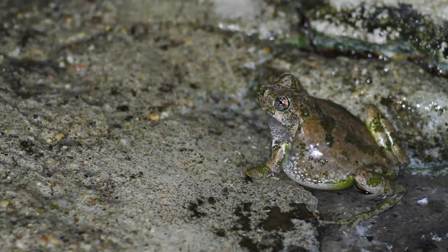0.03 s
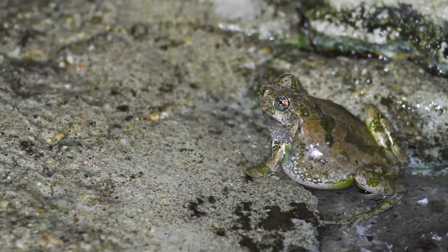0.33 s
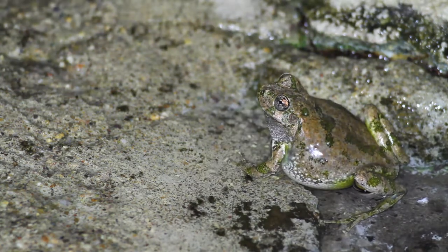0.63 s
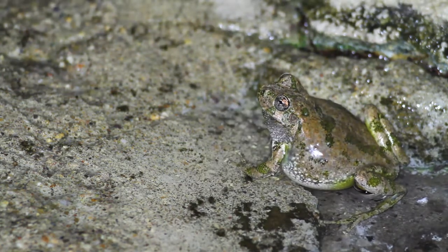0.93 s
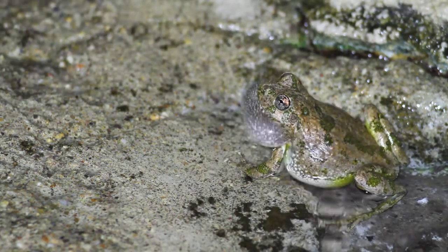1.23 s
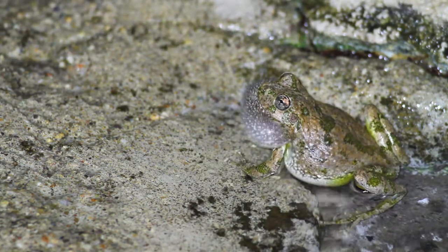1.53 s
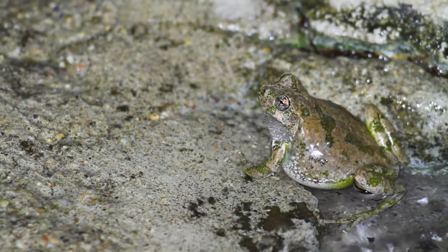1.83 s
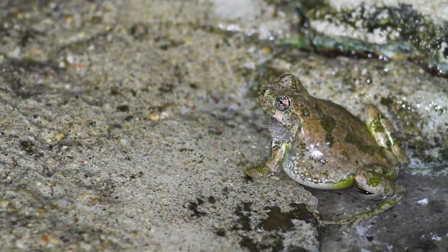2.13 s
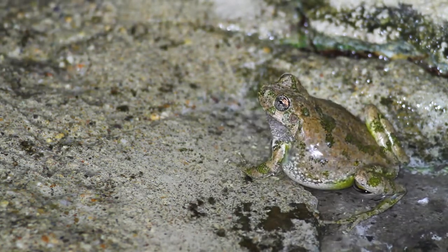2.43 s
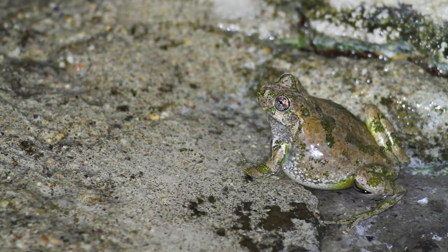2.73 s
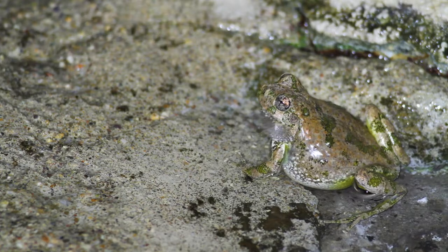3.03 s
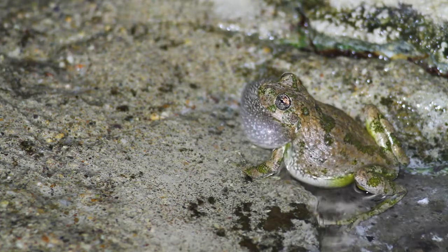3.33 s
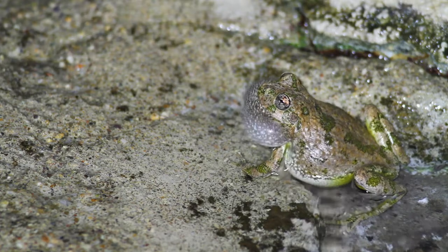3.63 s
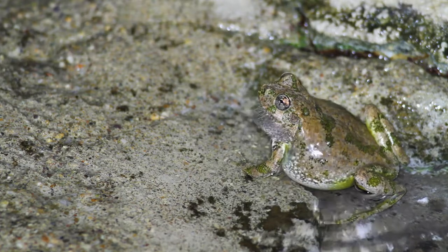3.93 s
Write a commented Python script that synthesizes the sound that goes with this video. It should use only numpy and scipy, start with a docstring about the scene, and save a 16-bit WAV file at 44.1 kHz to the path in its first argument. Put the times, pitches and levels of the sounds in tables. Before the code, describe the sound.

Tree frogs call in fast rattling trills. After a clipped note and small splashes, two frogs overlap from about 0.3 to 1.1 seconds. A close frog trills from 1.2 to 1.8, and a softer one follows until 2.2. Two return around 2.4, joined by the close frog from 3.2 to 3.9. Light drips, a distant chorus, faint low hum and night air continue throughout.

```python
"""Night on wet concrete by shallow water: faint air, a hum, a far chorus and droplets run throughout.
One short frog note ends a trill at the very start; splashes and plops follow. Then four tree frogs trill
in overlapping turns: one opens, another breaks in with two squawks, then the near one, then a softer one;
three return. A trill runs at about 28 notes a second and slows a little. Each note is a short rising
hoot of the vocal sac; on two of its cycles the larynx snaps and rings the throat near 2.4 kHz."""
import sys
import numpy as np
from scipy import signal
from scipy.fft import rfft, irfft
from scipy.io import wavfile

SR = 44100
rng = np.random.default_rng(int(sys.argv[2]) if len(sys.argv) > 2 else 0)


def to_wav(sig):
    """Store sig (one row per channel, or 1-D mono) as 16-bit WAV at the path in sys.argv[1].

    Samples outside -1..1 are clipped; the rate is SR.
    """
    pcm = np.clip(np.atleast_2d(sig), -1, 1) * 32767
    pcm = np.round(pcm).astype(np.int16)
    wavfile.write(sys.argv[1], SR, pcm.T)  # frames by channels


N = 176400
TIME = np.arange(N) / SR
NOTE_TIME = np.arange(-int(.03 * SR), int(.025 * SR)) / SR  # seconds around a note's first snap

# Tone of the night air and of the far chorus. Each row: frequency in Hz, relative level in dB.
AIR_SPECTRUM = [(20, -25), (50, -10.5), (90, -6), (130, -2.5), (180, -11), (320, -1), (600, -8), (1500, -4),
                (3000, -8), (5500, -10.5), (8500, -19.5), (13000, -19), (16000, -45)]
CHORUS_SPECTRUM = [(400, -30), (560, -12), (800, -4), (1100, -6), (1600, -9), (2000, -1), (2400, 2),
                   (2750, -4), (3300, -14), (6000, -28)]
# Partials of the hum. Each row: frequency in Hz, level in dB.
HUM_PARTIALS = [(74, -83), (91.5, -64.5), (127, -68)]
# Rings of the finest droplets. Each entry: frequency in Hz.
DROPLET_RINGS = [4200, 4970, 5730, 7700, 9900, 12400, 14000]
# Short rings: first a 2.3 kHz frog note that ends a trill, then the plops.
# Each row: start in seconds, pitch in Hz, peak in dB, decay in seconds.
RING_CUES = [(.021, 2300, -24, 0.0016), (.234, 2200, -28.5, 0.0019), (.352, 315, -47.5, 0.014),
             (0.544, 273, -40, 0.0068), (3.075, 180.7, -53, 0.011)]
# Splashes and drips. Each row: start in seconds, peak before the trim in dB, ring in Hz.
SPLASH_CUES = [(0.0543, -24, 12000), (0.2349, -18.5, 6040), (0.4219, -31, 4670), (0.4918, -27, 12500),
               (0.5397, -18, 8330), (0.5985, -29, 8710), (0.6394, -29, 4130), (1.1373, -26, 9700),
               (1.4711, -23.5, 9450), (1.5539, -37.5, 4150), (1.8562, -37, 4590), (2.4523, -29, 6410),
               (2.6698, -32, 4560), (2.9906, -28, 11400), (3.1547, -31, 4540), (3.2151, -27, 4130),
               (3.2675, -33, 8020), (3.5109, -34, 5760), (3.6431, -29, 4800), (3.8332, -26.5, 13400),
               (3.9335, -35, 10780), (3.9644, -27, 5510)]
# Throat colour, by frog. Each row: frequency in Hz, relative level in dB.
THROAT_SPECTRA = { "near": [(250, -36), (600, -13), (760, -7), (880, -14), (1100, -8), (1600, -10),
                  (2000, -12), (2300, 3), (2500, 4), (2820, 0), (3000, -16), (3400, -20), (3900, -20),
                  (4400, -29), (4700, -27), (5300, -38), (6000, -31), (9000, -48), (16000, -60)],
                  "second": [(250, -44), (600, -14), (900, -9), (1300, -7), (1620, -7), (1870, -17),
                  (2130, 3), (2400, 6), (2730, 1), (2930, -9), (3300, -12), (3650, -25), (4900, -26),
                  (6000, -40), (9000, -49), (16000, -58)], "third": [(250, -29), (600, 2), (950, -3),
                  (1200, 1), (1600, 0), (1800, -5), (2100, 1), (2370, 14), (2700, 6), (3100, -4),
                  (3700, -10), (4500, -22), (6000, -30), (16000, -60)], "fourth": [(250, -34.5),
                  (650, -7.5), (900, -10), (1300, -6), (1650, -9), (2000, -1), (2350, 4), (2700, -6),
                  (3100, -13), (3700, -13.5), (4400, -29), (6000, -32), (16000, -56.5)]}
# Voice, by frog. Each row: hoot pitch in Hz, rise per second as a share of that pitch, hold in seconds,
# buzz gain in dB, second snap against the first in dB, share of snaps two cycles apart instead of
# three, snap unevenness in dB.
FROG_VOICES = { "near": (563, 11.5, .0085, -7, .4, 0, .4), "second": (540.5, 8, .0065, -3, -1.5, .75, 1.2),
               "third": (535.5, 7, .007, -2, -1.5, .9, 1.5), "fourth": (561.5, 11.5, .0074, -2, -4, 0, .5)}
# Hoots that open a trill before the larynx snaps. Each row: frog, time in seconds, level in dB.
OPENING_CUES = [("third", .263, -27.5), ("second", .419, -19.5), ("near", 1.144, -21),
                ("second", 2.377, -25.5), ("third", 2.506, -17.5), ("near", 3.121, -16)]
# Trills. Each row: frog, first note in seconds, end in seconds, first note spacing in seconds,
# slowing in seconds per note, hoot level in dB, hoot fade in dB per second, snap level in dB,
# how much softer it starts in dB, throat sag per second as a share of its pitch.
TRILL_CUES = [ ("third", .2958, .845, .0338, .00022, -26, 0, -10.5, 1.5, 0),
              ("second", .4518, 1.085, .03175, .00028, -18.3, 8, -5.3, 1.8, 0),
              ("near", 1.1745, 1.835, .0345, .00011, -17, .87, -4.7, 6, .03),
              ("fourth", 1.639, 2.015, .035, .00017, -28.5, 0, -9.3, 3.6, .03),
              ("fourth", 2.0486, 2.225, .0365, .0014, -27, 0, -8.8, 0, .03),
              ("second", 2.4064, 2.92, .03436, .00012, -20, 5.3, -4.5, 2.2, 0),
              ("third", 2.5372, 3.80, .0335, .000122, -22, 3, -10.5, 0, 0),
              ("near", 3.1564, 3.922, .03474, .000084, -18, 0, -4.8, 2.5, .01)]
# Squawks. Each row: frog, time in seconds, hoot level in dB, snap level in dB, hold in seconds,
# extra buzz in dB, throat pitch as a share of normal.
SQUAWK_CUES = [("second", .447, -23, -11, .010, 8, .84), ("second", .479, -29, -15, .009, 7, .92)]
# Tone of the echo from walls and trees. Each row: frequency in Hz, relative level in dB.
ECHO_SPECTRUM = [(200, -14), (550, -12), (900, 1), (1500, 0), (2050, 0.5), (2450, 1), (2900, -3.5),
                 (5000, -2), (12000, -9)]

AIR_DB, CHORUS_DB, CHORUS_THROB, CHORUS_NOTES_PER_S = -47.5, -44.5, .66, 22
PATTER_PER_S, PATTER_DB, PATTER_SPREAD_DB = 200, -51, 4
DRIP_DECAY_S, SPLASH_TRIM_DB = .0032, -1
HOOT_ATTACK_S, HOOT_RELEASE_S, OCTAVE_DB = .0065, .0025, -17
FLUTTER_DEPTH, FLUTTER_HZ = .22, 300
RASP_DB, BUZZ_SCATTER_DB, BUZZ_SOFT_HZ = -19.5, 3, 2960
CYCLE_JITTER_S, SNAP_LAG_S = .00004, .00011  # the second snap lands just after its cycle
SLACK_TENSION = .965  # below this the snaps always fall two cycles apart
THROAT_RING_S, THROAT_LOW_CUT_HZ = .0028, 470
PITCH_SCATTER, THROAT_SCATTER, HOOT_SCATTER_DB, NOTE_JITTER_S = .006, .008, .3, .0002
SWELL_S, CLIMB_S, CLIMB_SHARE = .1, .08, .07  # the throat starts flat by this share and tightens
ECHO_DB, ECHO_CENTRE_S, TAIL_DB, TAIL_T60_S = -18.5, .0083, -19, .6
CUTOFF_HZ = 15900


def from_db(db):
    """Decibels to gain."""
    return 10 ** (np.asarray(db) / 20)


def rms_one(x):
    """Scale to unit power."""
    return x / np.sqrt(np.mean(x ** 2) + 1e-20)


def add(out, start_s, sound):
    """Mix a sound in at a given time."""
    i = int(np.clip(start_s * SR, 0, N - 1))
    out[i:i + len(sound)] += sound[:N - i]


def butter(x, order, hz, kind):
    """Low-pass or high-pass filter."""
    return signal.sosfilt(signal.butter(order, hz, kind, fs=SR, output="sos"), x)


def eq_curve(spectrum, size, stretch=1):
    """A spectrum as a gain per FFT bin; stretch scales its frequencies."""
    hz, db = np.transpose(spectrum)
    bins = np.maximum(np.fft.rfftfreq(size, 1 / SR), 1)
    return from_db(np.interp(np.log(bins), np.log(hz * stretch), db))


def coloured_noise(spectrum):
    """Unit-power noise with a given spectrum."""
    return rms_one(irfft(rfft(rng.standard_normal(N)) * eq_curve(spectrum, N), N))


def resonance(x, hz, width_hz):
    """Two-pole resonance with unit gain at its top."""
    r = np.exp(-np.pi * width_hz / SR)
    feedback = [1, -2 * r * np.cos(2 * np.pi * hz / SR), r * r]
    return signal.lfilter(np.array([1, 0, -1]) * (1 - r * r) / 2, feedback, x + 1e-18)


def short_rings(cues):
    """Single pitches that bloom and die quickly."""
    out, t = np.zeros(N), TIME[:SR // 10]
    for start_s, hz, db, decay_s in cues:
        envelope = t / decay_s * np.exp(1 - t / decay_s)
        add(out, start_s, from_db(db) * envelope * np.sin(2 * np.pi * hz * t))
    return out


def night_air():
    """A soft, steady bed of noise."""
    return from_db(AIR_DB) * coloured_noise(AIR_SPECTRUM)


def hum():
    """Three faint, low, steady tones."""
    return sum(from_db(db) * np.sqrt(2) * np.sin(2 * np.pi * (hz * TIME + rng.random()))
               for hz, db in HUM_PARTIALS)


def far_chorus():
    """Distant frogs blur into one throbbing band."""
    throb = 1 + CHORUS_THROB * np.sin(2 * np.pi * CHORUS_NOTES_PER_S * TIME)
    return from_db(CHORUS_DB) * throb * coloured_noise(CHORUS_SPECTRUM)


def patter():
    """Fine droplets land at random, each a tiny ringing burst of spray."""
    out = np.zeros(N)
    for hz in DROPLET_RINGS:
        lands = rng.random(N) < PATTER_PER_S / len(DROPLET_RINGS) / SR
        drops = lands * from_db(PATTER_SPREAD_DB * np.minimum(rng.exponential(1, N), 4))
        envelope = signal.lfilter([1], [1, -np.exp(-1 / (DRIP_DECAY_S * SR))], drops + 1e-18)
        out += resonance(envelope * rng.standard_normal(N), hz, width_hz=1900)
    return from_db(PATTER_DB) * rms_one(out)


def lone_frog_note():
    """The last note of a trill, one short ring at the very start."""
    return short_rings(RING_CUES[:1])


def splashes():
    """Small splashes and drips: bright ticks of noise with a broad ring."""
    out, t = np.zeros(N), TIME[:SR // 10]
    for start_s, db, hz in SPLASH_CUES:
        burst = rng.standard_normal(len(t)) * np.exp(-t / DRIP_DECAY_S)
        splash = resonance(burst, hz, width_hz=6900)
        add(out, start_s, from_db(db + SPLASH_TRIM_DB) * splash / np.abs(splash).max())
    return out


def plops():
    """The water rings briefly, once high and three times low."""
    return short_rings(RING_CUES[1:])


def vocal_sac(phase, pitch_hz):
    """The hoot: a tone and its soft octave, roughened by the flutter of the sac."""
    flutter = rms_one(butter(rng.standard_normal(len(phase)), 2, FLUTTER_HZ, "low"))
    rough = butter(flutter * np.sin(phase), 6, pitch_hz, "high")
    return np.sin(phase) + from_db(OCTAVE_DB) * np.sin(2 * phase) + FLUTTER_DEPTH * rough


def larynx(frog, phase, envelope, snap_gain, extra_buzz_db, tension):
    """Hard snaps on two cycles of the hoot, soft raspy pulses on the others."""
    buzz_db, second_db, early_share, uneven_db = FROG_VOICES[frog][3:]
    cycles = np.arange(-9, 7)  # cycle 0 carries the first snap
    cycle_s = np.interp(2 * np.pi * cycles, phase, NOTE_TIME)
    cycle_s += CYCLE_JITTER_S * rng.normal(size=len(cycles))
    pulse_at = np.searchsorted(NOTE_TIME[:-1], cycle_s)
    buzz = from_db(RASP_DB) * rng.standard_normal(len(NOTE_TIME))
    second_cycle = 2 if rng.random() < early_share or tension < SLACK_TENSION else 3
    is_soft = ~np.isin(cycles, [0, second_cycle])
    buzz[pulse_at] += is_soft * from_db(BUZZ_SCATTER_DB * rng.normal(size=len(cycles)))
    buzz = butter(buzz * envelope, 1, BUZZ_SOFT_HZ, "low") * 2 * from_db(buzz_db + extra_buzz_db)
    snaps = np.zeros(len(NOTE_TIME))
    snaps[pulse_at[cycles == 0]] = from_db(uneven_db * rng.normal())
    second_at = pulse_at[cycles == second_cycle] + int(SNAP_LAG_S * SR)
    snaps[second_at] = from_db(second_db + uneven_db * rng.normal())
    return buzz + snap_gain * snaps


def throat(frog, pulses, tension):
    """Pulses ring the throat for a few milliseconds; tension scales the pitch of the ring."""
    size = 4096
    cepstrum = irfft(np.log(eq_curve(THROAT_SPECTRA[frog], size, tension)))
    folded = np.r_[cepstrum[0], 2 * cepstrum[1:size // 2]]  # minimum phase keeps the attack sharp
    ring = irfft(np.exp(rfft(folded, size)))
    ring *= np.exp(-(TIME[:size] / THROAT_RING_S) ** 4)
    return butter(signal.fftconvolve(pulses, ring)[:len(pulses)], 2, THROAT_LOW_CUT_HZ, "high")


def note(frog, hoot_db, snap_gain, hold_s, extra_buzz_db, tension):
    """A rising hoot swells, holds and closes quickly while the larynx rings the throat."""
    pitch_hz, rise = FROG_VOICES[frog][:2]
    pitch_hz *= 1 + PITCH_SCATTER * rng.normal()
    phase = 2 * np.pi * pitch_hz * (NOTE_TIME + rise * NOTE_TIME ** 2 / 2)
    attack = np.exp(np.minimum(NOTE_TIME, 0) / HOOT_ATTACK_S)
    release = np.exp(-(np.maximum(NOTE_TIME - hold_s, 0) / HOOT_RELEASE_S) ** 2)
    envelope = from_db(hoot_db + HOOT_SCATTER_DB * rng.normal()) * attack * release
    pulses = larynx(frog, phase, envelope, snap_gain, extra_buzz_db, tension)
    hoot = envelope * vocal_sac(phase, pitch_hz)
    ring = throat(frog, pulses, tension + THROAT_SCATTER * rng.normal())
    full_snap = np.abs(throat(frog, signal.unit_impulse(len(NOTE_TIME)), 1)).max()
    return hoot + ring / full_snap


def opening_hoots():
    """A soft hoot with no snap leads into most trills."""
    out = np.zeros(N)
    for frog, time_s, db in OPENING_CUES:
        hoot = note(frog, db, snap_gain=0, hold_s=.003, extra_buzz_db=-9.5, tension=1 - CLIMB_SHARE)
        add(out, time_s + NOTE_TIME[0], hoot)
    return out


def trills():
    """Runs of notes that climb as the throat tightens and slowly lose pace; most swell in."""
    out, count = np.zeros(N), np.arange(40)
    for frog, start_s, end_s, spacing_s, slowing_s, hoot_db, fade, snap_db, soft_db, sag in TRILL_CUES:
        times = start_s + spacing_s * count + slowing_s * count ** 2 / 2
        hold_s = FROG_VOICES[frog][2]
        for time_s in times[times < end_s]:
            age_s = time_s - start_s
            effort_db = -soft_db * np.exp(-(age_s / SWELL_S) ** 2)
            tension = 1 - CLIMB_SHARE * np.exp(-age_s / CLIMB_S) - sag * age_s
            level_db = hoot_db + effort_db - fade * age_s
            sound = note(frog, level_db, from_db(snap_db + effort_db), hold_s, 0, tension)
            add(out, time_s + NOTE_TIME[0] + NOTE_JITTER_S * rng.normal(), sound)
    return out


def squawks():
    """Rough, buzzy notes from a slack throat as a frog breaks in."""
    out = np.zeros(N)
    for frog, time_s, hoot_db, snap_db, hold_s, buzz_db, tension in SQUAWK_CUES:
        add(out, time_s + NOTE_TIME[0], note(frog, hoot_db, from_db(snap_db), hold_s, buzz_db, tension))
    return out


def echo(x):
    """Quick scatter from the walls and trees around the water, then a faint longer tail."""
    early = coloured_noise(ECHO_SPECTRUM) * TIME * np.exp(-2 * TIME / ECHO_CENTRE_S)
    late = coloured_noise(ECHO_SPECTRUM) * from_db(-60 * TIME / TAIL_T60_S)
    response = (from_db(ECHO_DB) * rms_one(early) + from_db(TAIL_DB) * rms_one(late)) / np.sqrt(N)
    return signal.fftconvolve(x, response)[:N]


def scene():
    """Frogs and water up front with their echo, over the night bed, in mono."""
    frogs = lone_frog_note() + trills() + opening_hoots() + squawks()
    water = splashes() + plops() + patter()
    foreground = frogs + water
    return (foreground + echo(foreground) + hum() + far_chorus() + night_air())[None]


def record(dry):
    """A steep low-pass takes off the very top."""
    return signal.sosfilt(signal.ellip(10, .2, 80, CUTOFF_HZ, fs=SR, output="sos"), dry)


dry = scene()
out = record(dry)
to_wav(out)
```